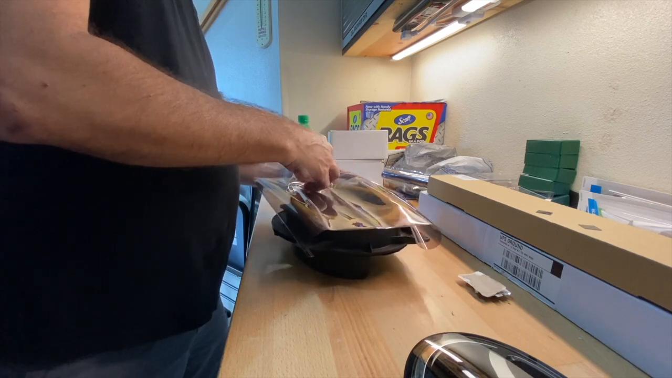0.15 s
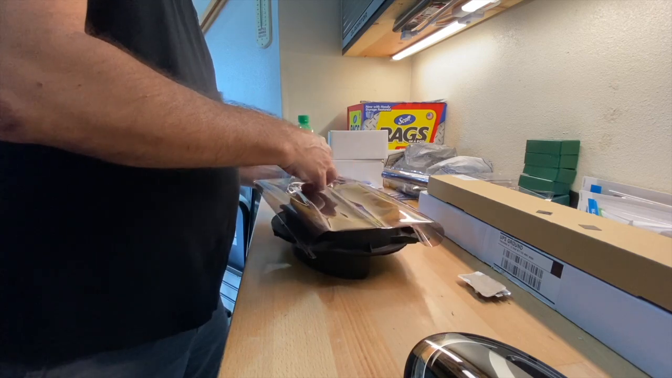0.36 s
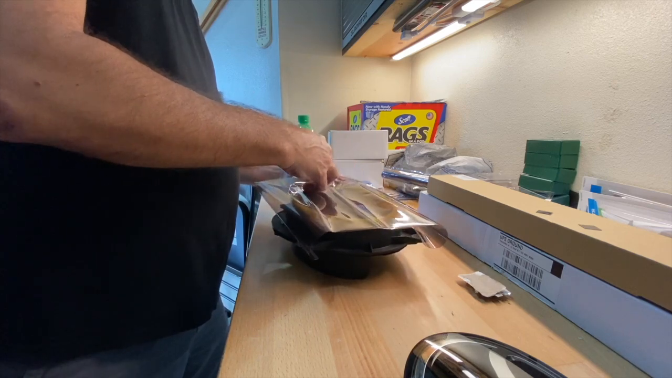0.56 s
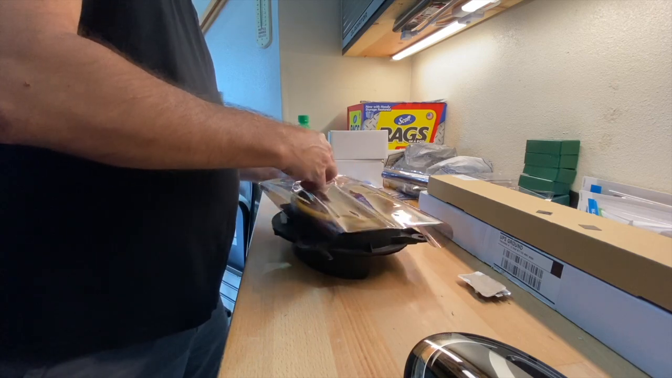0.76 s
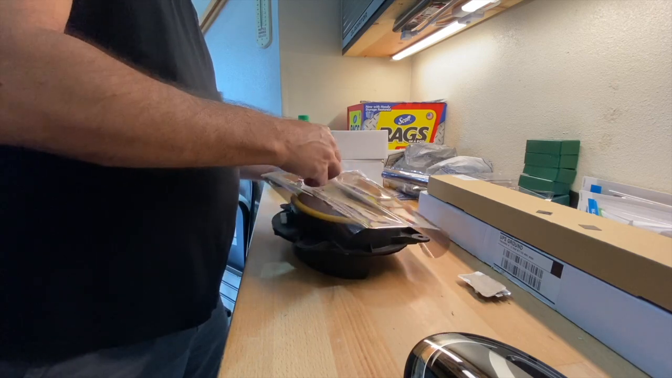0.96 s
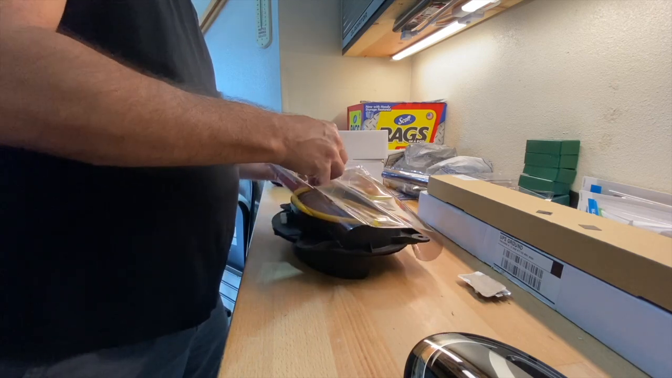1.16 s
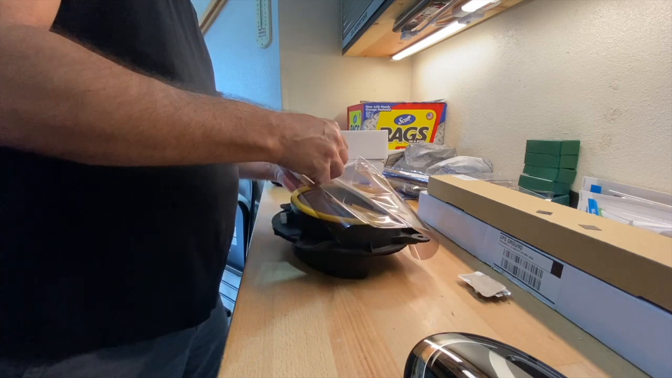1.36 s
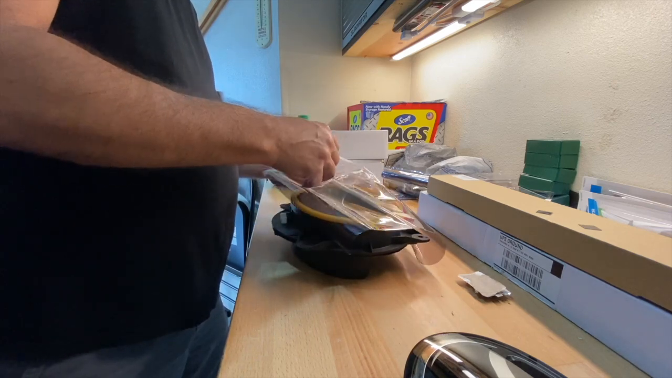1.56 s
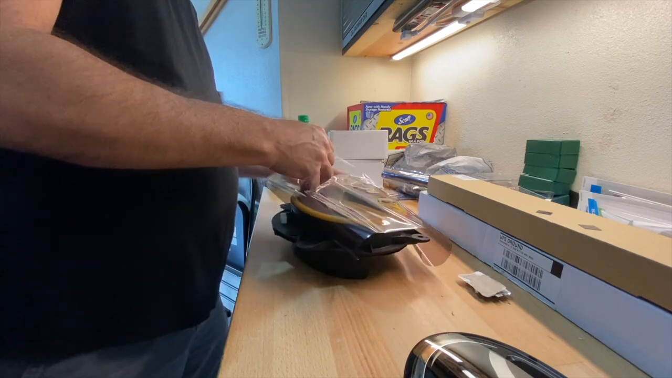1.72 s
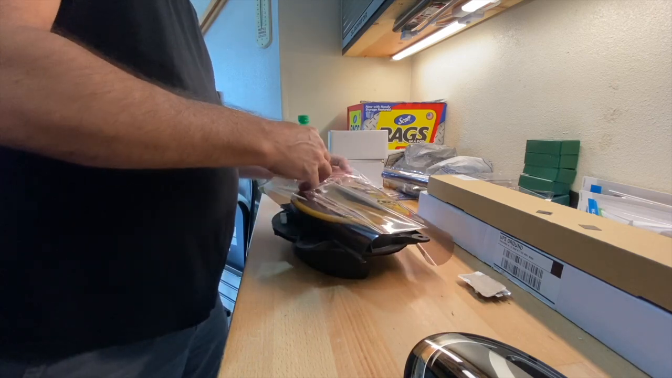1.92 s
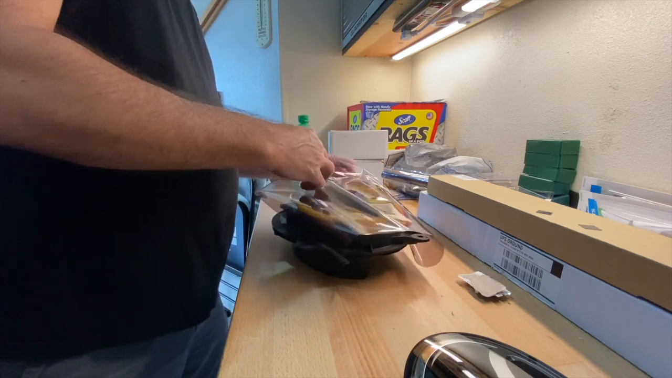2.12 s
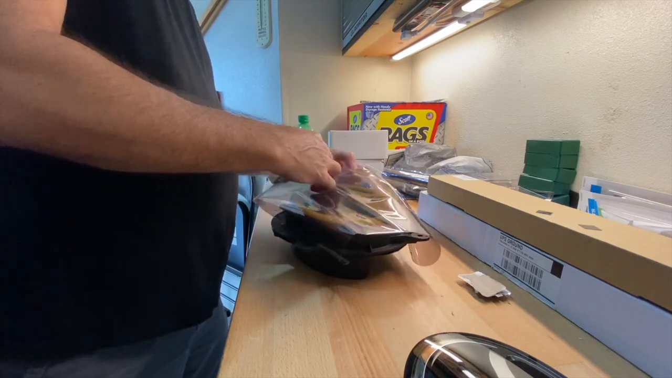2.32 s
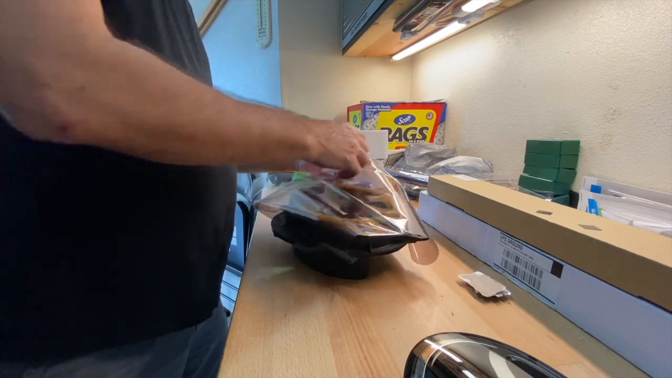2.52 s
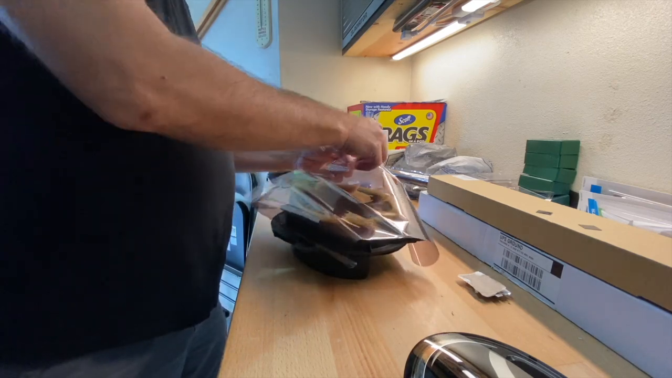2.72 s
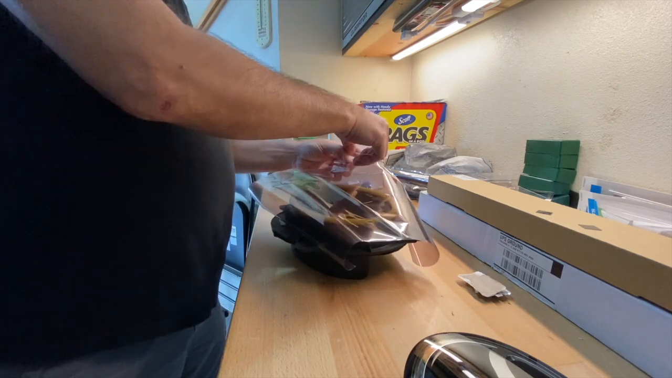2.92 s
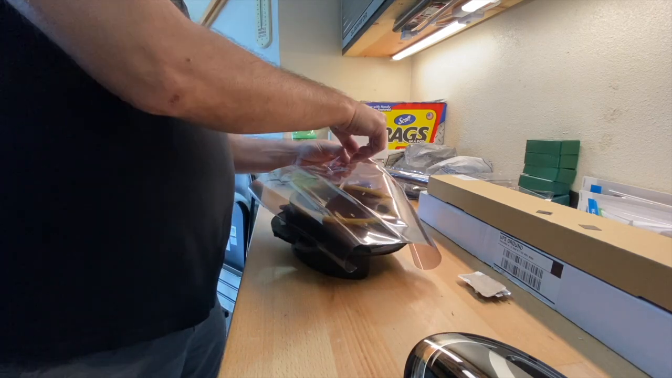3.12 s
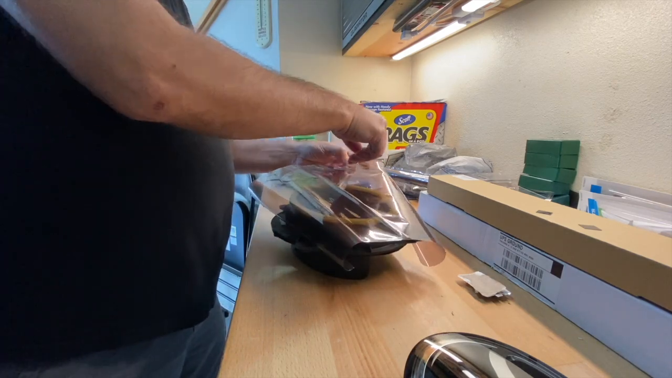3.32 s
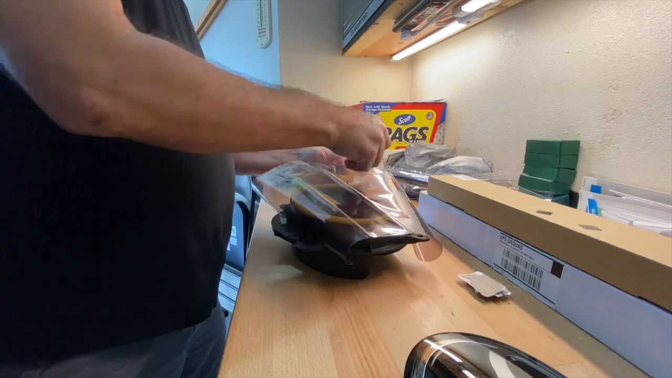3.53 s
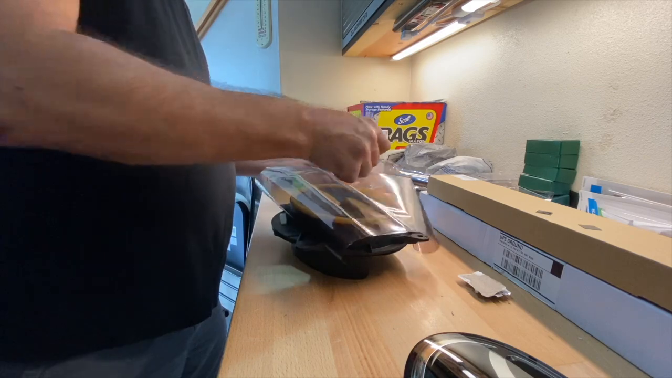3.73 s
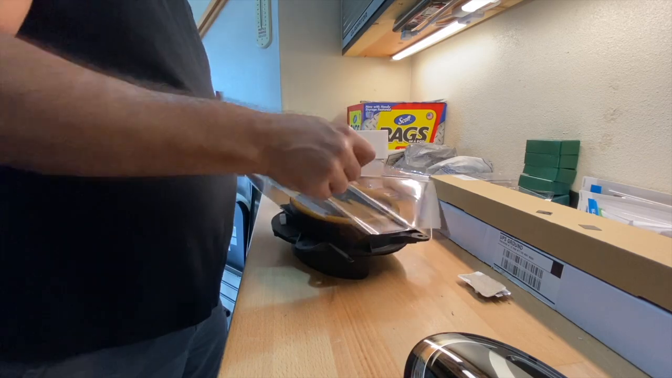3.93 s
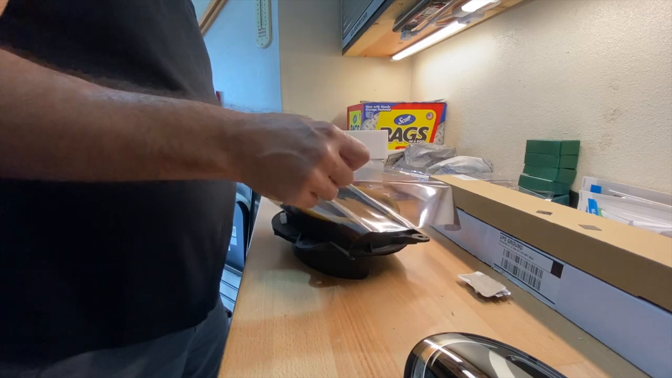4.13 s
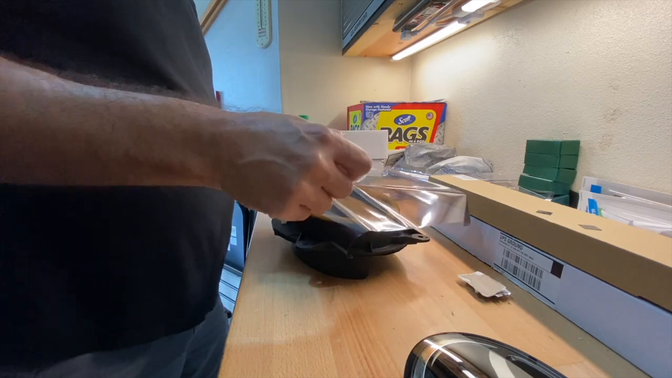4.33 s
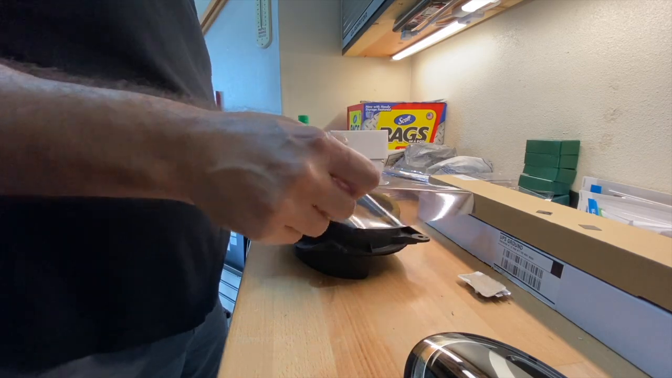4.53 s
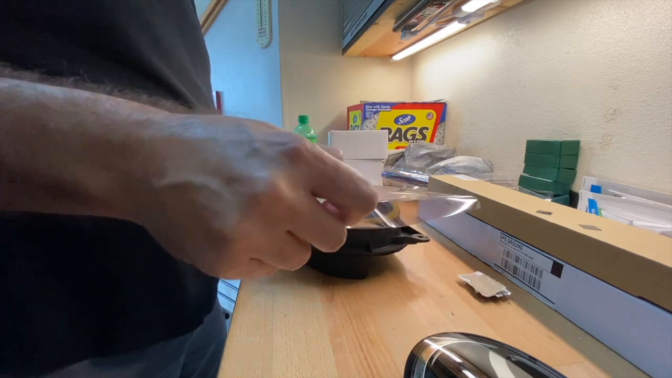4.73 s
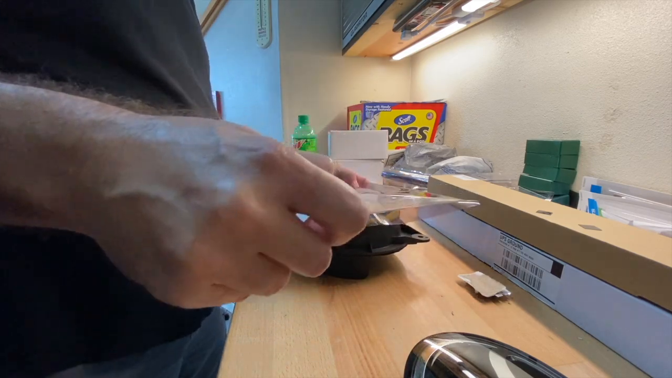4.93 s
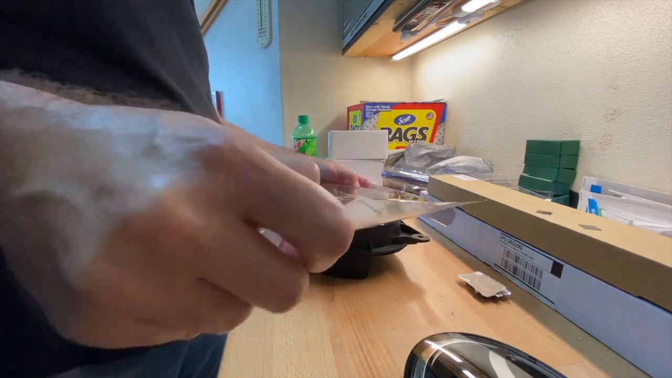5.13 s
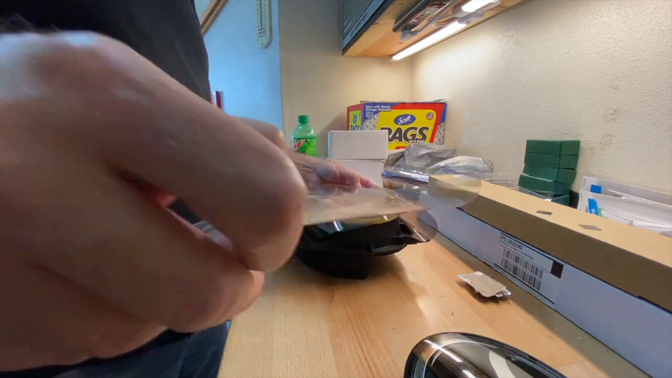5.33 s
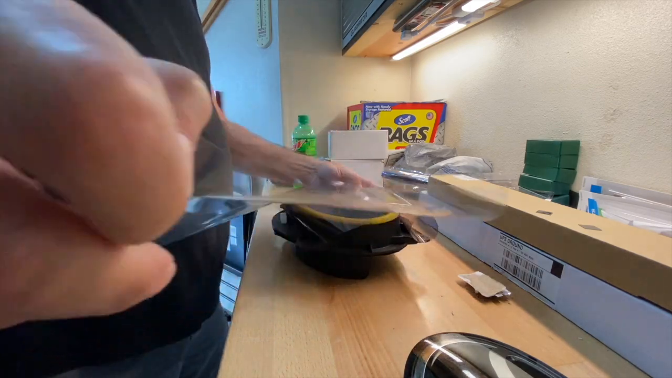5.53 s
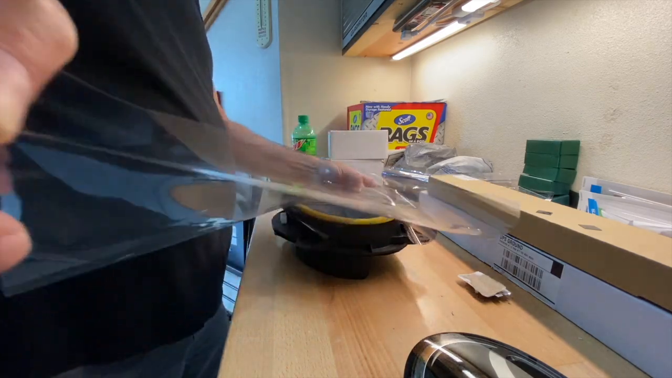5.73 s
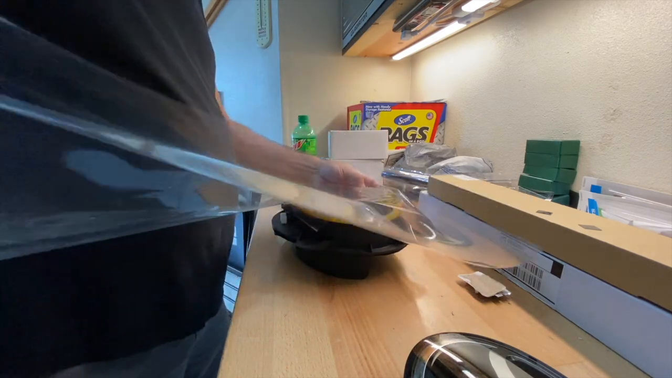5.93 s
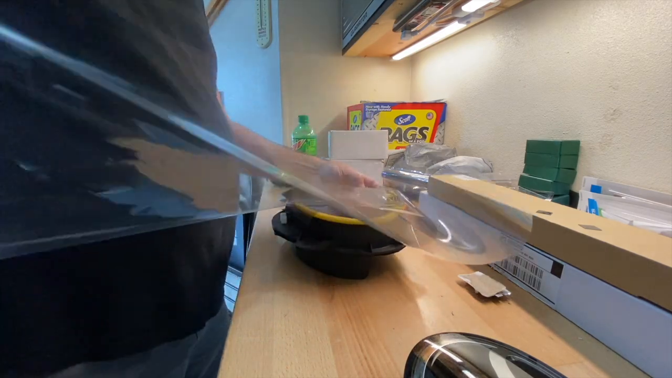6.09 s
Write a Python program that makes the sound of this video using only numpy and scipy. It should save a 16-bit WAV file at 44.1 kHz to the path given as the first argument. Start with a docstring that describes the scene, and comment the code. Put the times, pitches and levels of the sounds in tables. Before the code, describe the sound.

Close, crisp crinkling and sharp snapping of clear protective film being pulled loose in jerks, with dull plastic pops and a faint low room rumble.

```python
"""Faint ticks over a low room rumble grow into bright, crackling snaps: a protective film is peeled by hand
off a thin, stiff plastic sheet over a workbench in a small room. The glue lets go in jerks; each snap is a
shaped noise burst with a ring and scatter. Random tiny grains make the crinkling, and rarer dull pops with
a brief tone are the sheet buckling, mostly what makes its low thumps too. Hands rub the plastic in grains
of a lower colour; a close two-port microphone picks it all up."""
import sys
import numpy as np
from scipy import signal
from scipy.fft import rfft, irfft, next_fast_len
from scipy.io import wavfile
from scipy.ndimage import uniform_filter1d

SR = 44100
rng = np.random.default_rng(int(sys.argv[2]) if len(sys.argv) > 2 else 0)


def output_pcm(signal):
    """Save a mono or channel-first signal as 16-bit PCM at the path in sys.argv[1].

    Samples are clipped to [-1, 1] before scaling.
    """
    pcm = np.clip(np.atleast_2d(signal).T, -1, 1) * 32767
    wavfile.write(sys.argv[1], SR, np.round(pcm).astype(np.int16))


N = 271652
TIME = np.arange(N) / SR
BURST_TIME = np.arange(4096) / SR
# frequency grid with room for one second of filter tail
FFT_SIZE = next_fast_len(N + SR, real=True)
HZ = np.maximum(np.arange(FFT_SIZE // 2 + 1) * SR / FFT_SIZE, 1)


def from_db(db):
    """Decibels to gain."""
    return 10 ** (np.asarray(db) / 20)


def rms_one(x):
    """Scale to unit power."""
    return x / np.sqrt(np.mean(np.abs(x) ** 2) + 1e-20)


def at_hz(points):
    """Read a table at every frequency, joined on a log axis."""
    hz, value = np.transpose(points)
    return np.interp(np.log(HZ), np.log(hz), value)


def coloured(x, spectrum):
    """Causal (minimum-phase) filter with this spectrum's shape and unit power gain."""
    cepstrum = irfft(np.log(rms_one(from_db(at_hz(spectrum)))), FFT_SIZE)
    # folding the cepstrum onto positive time gives minimum phase
    cepstrum[1:FFT_SIZE // 2] *= 2
    cepstrum[FFT_SIZE // 2 + 1:] = 0
    response = np.exp(rfft(cepstrum))
    return irfft(rfft(x, FFT_SIZE) * response, FFT_SIZE)[:, :N]


def filtered(x, order, hz, kind="low"):
    """Butterworth filter."""
    return signal.sosfilt(signal.butter(order, hz, kind, fs=SR, output="sos"), x)


def add(out, start_s, sound):
    """Mix a short sound in at a time."""
    start = max(round(start_s * SR), 0)
    out[:, start:start + sound.shape[1]] += sound[:, :N - start]


def burst(rise_s, decay_s, lumpy_db):
    """Bending waves spread from a slip and come back unevenly from the creases; each port hears its own mix."""
    lumps = rms_one(uniform_filter1d(rng.standard_normal(len(BURST_TIME)), size=50))
    envelope = (1 - np.exp(-BURST_TIME / rise_s)) * np.exp(-BURST_TIME / decay_s)
    envelope = envelope * from_db(lumpy_db * lumps)
    return rms_one(envelope * rng.standard_normal((2, len(BURST_TIME))))


def grains(per_s, spread_db, decay_s):
    """Tiny slips at random, mostly weak and a few strong, each dying away exponentially; unit power."""
    sizes = from_db(spread_db * np.minimum(rng.exponential(1, N), 3.5))
    hits = rng.random(N) < per_s / SR
    decay_per_sample = np.exp(-2 / (decay_s * SR))
    power = signal.lfilter([1], [1, -decay_per_sample], hits * sizes ** 2 + 1e-18)
    return rms_one(np.sqrt(power) * rng.standard_normal((2, N)))


# Spectrum of the room's rumble: pitch_hz, relative density_db (per Hz)
RUMBLE_COLOUR = [(25, -15.5), (75, -2), (250, -18), (700, -23), (5000, -32.5), (14000, -55)]


def room_rumble(level_db):
    """The room's steady low rumble is shaped noise."""
    return from_db(level_db) * coloured(rng.standard_normal((2, N)), RUMBLE_COLOUR)


def room(x, tail_db, t60_s, wall_hz):
    """The tail of a small room is decaying noise, dulled by its walls."""
    t = np.arange(SR) / SR
    tail = rng.standard_normal((2, SR)) * (1 - np.exp(-t / .0042)) * from_db(-60 * t / t60_s)
    tail = filtered(rms_one(tail) / np.sqrt(SR), 2, min(wall_hz, SR * .45))
    return x + from_db(tail_db) * signal.fftconvolve(x, tail, axes=1)[:, :N]


# Pulls on the film: start_s, end_s, crinkling_db, rubbing_db (both at the start, before layer trims)
PULLS = [(0.103, 0.095, -89, -63), (0.684, 0.72, -63, -50), (0.885, 1.02, -30.5, -40),
         (1.184, 1.243, -31.5, -42.5), (1.542, 1.884, -41.5, -44), (2.16, 2.185, -43, -47.5),
         (2.315, 2.372, -36, -47.5), (2.44, 2.78, -51.5, -60.5), (3.494, 3.8, -37, -53),
         (3.688, 4.277, -32.5, -48), (4.314, 4.87, -34, -48.5), (4.774, 5.27, -42, -48.5),
         (5.416, 5.83, -38.5, -41), (5.635, 6.3, -58, -54.5)]


def pulling(levels_db, rise_db_per_s, fall_db_per_s, sag_db_per_s=2.5):
    """Level in dB through all pulls: each builds up, sags as the film gives way, and relaxes."""
    shapes = []
    for (start_s, end_s, *_), top_db in zip(PULLS, levels_db):
        early_s = np.maximum(start_s - TIME, 0)
        held_s = np.clip(TIME - start_s, 0, end_s - start_s)
        late_s = np.maximum(TIME - end_s, 0)
        shapes.append(top_db - rise_db_per_s * early_s - sag_db_per_s * held_s - fall_db_per_s * late_s)
    return np.max(shapes, axis=0)


# Low spectrum of the handled sheet: pitch_hz, relative density_db (per Hz)
HANDLING_COLOUR = [(50, -12.5), (110, -1.5), (260, -5), (450, 1.5), (650, -3.5), (930, 2.5), (3000, -11.5)]


def rubbing(hands_db):
    """Skin catches and slips on the plastic in soft, overlapping grains."""
    return from_db(hands_db + 3) * coloured(grains(per_s=110, spread_db=2.5, decay_s=.0098), HANDLING_COLOUR)


# Low thumps of the whole sheet, mostly as it buckles: start_s, level_db (before the colour and low-pass)
THUMPS = [(0.121, -42.5), (1.25, -39), (2.441, -40), (3.166, -43)]


def thumps(top_hz):
    """The whole sheet moves, mostly as it buckles, and thumps mainly in the bass."""
    out = np.zeros((2, N))
    for start_s, level_db in THUMPS:
        add(out, start_s, from_db(level_db) * burst(rise_s=.006, decay_s=.016, lumpy_db=1))
    return filtered(coloured(out, HANDLING_COLOUR), 2, top_hz)


def thuds(rows, gain_db, per_brightness_db):
    """Each snap also jolts the sheet in the hands; the large folds that snap dully jolt it most."""
    out = np.zeros((2, N))
    for start_s, level_db, brightness in rows:
        jolt_db = level_db + gain_db - per_brightness_db * brightness
        add(out, start_s, from_db(jolt_db) * burst(rise_s=.001, decay_s=.006, lumpy_db=3))
    return coloured(out, HANDLING_COLOUR)


# The whole sheet buckles: start_s, level_db (before the pop and tone gains), pitch_hz of the panel
BUCKLES = [(0.12, -49.5, 470), (0.522, -46.5, 440), (0.649, -31.5, 960), (0.801, -33.5, 970),
           (1.242, -30.5, 1044), (1.561, -32.5, 506), (1.66, -33.5, 784), (2.178, -38, 780),
           (2.441, -45.5, 327), (2.843, -40, 480), (3.167, -30, 954), (3.68, -33.5, 910), (5.527, -29, 870)]
# Spectrum of the pop: pitch_hz, relative density_db (per Hz)
BUCKLE_COLOUR = [(160, -6), (480, -2.5), (650, -3.5), (900, 3.5), (1400, -5.5), (2200, 0), (9000, -25)]


def buckles(gain_db, mode_db, mode_s):
    """A large area flips over: a dull pop, and the panel that flipped rings briefly."""
    pops, tones = np.zeros((2, 2, N))
    for start_s, level_db, pitch_hz in BUCKLES:
        add(pops, start_s, from_db(level_db + gain_db) * burst(rise_s=.002, decay_s=.006, lumpy_db=2))
        swing = np.sin(2 * np.pi * pitch_hz * BURST_TIME) * BURST_TIME * np.exp(-BURST_TIME / mode_s)
        add(tones, start_s, from_db(level_db + mode_db) * rms_one(swing[None]))
    return coloured(pops, BUCKLE_COLOUR) + tones


# Spectrum shared by crinkles, rasps and snaps: pitch_hz, relative density_db (per Hz)
SNAP_COLOUR = [(200, -26), (650, -23.5), (900, -11.5), (1350, -12), (1800, -3), (3900, -3.5), (5700, 1),
               (7700, -5), (10500, -4.5), (14500, -8.5), (16300, -40)]


def crinkles(peel_db, per_s, spread_db, decay_s, count=6):
    """Tiny slips of the film, each sounding in one of several pitch ranges, follow the pull."""
    edges_hz = np.geomspace(900, 16000, count + 1)
    slips = np.zeros((2, N))
    for band_hz in zip(edges_hz, edges_hz[1:]):
        slips += filtered(grains(per_s / count, spread_db, decay_s), 1, band_hz, "band")
    return from_db(peel_db - 4.5) * coloured(rms_one(slips), SNAP_COLOUR)


# A crease rolls along the film: start_s, level_db (before gain and colour), brightness_db_per_octave
RASPS = [(0.6514, -30.5, -4), (1.242, -19, 0), (1.4752, -26.5, -2.5), (1.558, -25, -1), (1.799, -26.5, 1),
         (2.041, -30.5, -3.5), (2.326, -26, 1), (2.335, -24.5, 0.5), (2.717, -35, -2), (3.159, -22, -0.5),
         (5.974, -19.5, -2.5)]


def rasps():
    """A rolling crease gives way slowly, in a drawn-out rasp with little ring."""
    return snaps(RASPS, gain_db=-10, rise_s=.012, decay_s=.006, ring_db=-12, bench_db=-8)


def stick_slip(peel_db, over_db, brightness, brightness_spread, spread_db=3, count=130):
    """Smaller snaps at loosely even times throughout, as loud as the pull is hard: rows like SNAPS."""
    jitter, size, colour = rng.standard_normal((count, 3)).T
    start_s = np.clip((np.arange(count) + .5 + .25 * jitter) / count, 0, 1) * TIME[-1]
    level_db = np.interp(start_s, TIME, peel_db) + over_db + spread_db * np.tanh(size)
    return np.transpose([start_s, level_db, brightness + brightness_spread * colour])


# Snaps that stand out from the crinkling, loud and faint:
# start_s, level_db (before gain and colour), brightness_db_per_octave
SNAPS = [(0.0123, -35.5, -5), (0.1045, -38, 4.5), (0.2377, -40.5, -7), (0.312, -49, 0.5),
         (0.3812, -37.5, -6), (0.637, -33.5, -4.5), (0.6877, -20, 7.5), (0.7789, -28.5, 5),
         (0.8065, -22.5, 1.5), (0.8608, -21.5, 2), (0.9155, -22.5, 5), (0.9408, -20, 4.5), (0.9478, -17, 5),
         (0.9727, -23, 1), (0.9962, -17, 3.5), (1.0132, -19, 6), (1.038, -24.5, 4), (1.0551, -10.5, 8),
         (1.0933, -25, 1.5), (1.1605, -17.5, 9), (1.1778, -22, 2), (1.1867, -23, 2.5),
         (1.2037, -25.5, -1.5), (1.2356, -29, 0.5), (1.2626, -21, -1), (1.283, -25.5, 2),
         (1.3125, -34, -0.5), (1.4276, -31.5, -2), (1.6613, -19.5, 5), (1.6915, -29, 2),
         (1.7617, -35.5, -1), (1.7876, -26.5, 4), (1.8987, -28, -1.5), (1.9635, -35, -4), (2.0866, -30, 5),
         (2.2637, -22.5, 4.5), (2.3609, -24, 3), (2.4058, -28.5, 4.5), (2.6499, -38, 0.5),
         (2.7088, -34.5, -3.5), (2.8437, -28, -3), (3.0131, -38.5, -3), (3.0523, -27, 2.5),
         (3.2986, -27, 4), (3.3141, -24, 0.5), (3.3515, -26.5, 2.5), (3.3714, -26, -1), (3.4424, -22, 1),
         (3.4811, -23.5, 2), (3.4937, -20.5, 4), (3.5177, -25, 1.5), (3.5289, -22.5, 3.5),
         (3.5422, -21.5, 3.5), (3.5551, -24, 4), (3.5693, -19, 3), (3.621, -28, 2), (3.682, -26, 6),
         (3.7088, -24.5, 5), (3.7226, -24.5, 3.5), (3.7325, -19.5, 3), (3.754, -17, 4), (3.7733, -23.5, 1),
         (3.821, -18.5, 2.5), (3.8491, -18, 4.5), (3.8854, -17, 8), (3.894, -18.5, 4.5), (3.9164, -20, 3.5),
         (3.9393, -20, 7.5), (3.9746, -20, 9), (3.9994, -22, 3), (4.033, -25, 1.5), (4.0517, -22, 5.5),
         (4.0646, -20, 3.5), (4.0768, -22, 3.5), (4.1335, -18.5, 1.5), (4.1456, -16.5, 3.5),
         (4.1663, -16.5, 6.5), (4.2179, -16, 8.5), (4.235, -24, 3.5), (4.304, -21.5, 4), (4.3221, -17.5, 7),
         (4.3584, -18.5, 6.5), (4.3885, -23, 1.5), (4.4333, -17.5, 8.5), (4.4559, -22, 2.5),
         (4.48, -27.5, 4), (4.5023, -21.5, 2.5), (4.5446, -24, 5.5), (4.5727, -22, 2.5), (4.6017, -20, 4),
         (4.6328, -23.5, 3), (4.6594, -20, 4), (4.7108, -23, 6), (4.7419, -22.5, 6), (4.7979, -21.5, 6.5),
         (4.8416, -26, 2), (4.8962, -27, 3.5), (4.9237, -23, 3.5), (4.9317, -22.5, 2.5),
         (4.9712, -21.5, 2.5), (5.0425, -26, 0.5), (5.077, -26.5, 0.5), (5.089, -21, 3.5),
         (5.1175, -21, 3.5), (5.1702, -19.5, 3.0), (5.2439, -14, 6), (5.2849, -22, 1.5), (5.3656, -29, -6),
         (5.4328, -20, 0.5), (5.461, -23, -2), (5.47, -22, 0.5), (5.4793, -20.5, -0.5),
         (5.5283, -21.5, 0.5), (5.5708, -19, 2), (5.6117, -17.5, 5.5), (5.637, -29, -4.5),
         (5.6631, -19.5, 3.5), (5.7639, -20.5, 2.5), (5.8329, -20.5, 2.5), (5.9009, -15.5, 5),
         (5.9725, -23.5, 3)]


def snaps(rows, gain_db, rise_s, decay_s, ring_db, bench_db):
    """A crack, the duller ring of the sheet, then scatter off bench and boxes; bright snaps ring least."""
    dull_hz, pivot_hz = 7800, 6500
    facet_db, facet_octaves = 5, .06
    out = np.zeros((2, N))
    hz = np.clip(np.fft.rfftfreq(len(BURST_TIME), 1 / SR), 600, None)
    fade = np.linspace(1, 0, len(BURST_TIME))
    for start_s, level_db, brightness in rows:
        # dull snaps come from larger folds, which give way more slowly
        slowness = from_db(-1.3 * brightness)
        crack = burst(rise_s=rise_s * slowness, decay_s=decay_s * slowness, lumpy_db=1)
        ring = from_db(ring_db - .35 * brightness) * burst(rise_s=.0015, decay_s=.0032, lumpy_db=3)
        scatter = from_db(bench_db) * burst(rise_s=.005, decay_s=.014, lumpy_db=2)
        spectrum = rfft(crack) + rfft(ring + scatter) / (1 + 1j * hz / dull_hz)
        # the creases around the slip bound small facets, which colour every snap differently
        facet_hz = np.exp(rng.uniform(np.log(1600), np.log(15000), (4, 1)))
        facets = facet_db / (1 + (np.log2(hz / facet_hz) / facet_octaves) ** 2)
        tilt_db = brightness * np.log2(hz / pivot_hz)
        snap = rms_one(irfft(spectrum * from_db(tilt_db + facets.max(axis=0))) * fade)
        # starting early makes room for the rise
        add(out, start_s - .0005 * slowness, from_db(level_db + gain_db) * snap)
    return coloured(out, SNAP_COLOUR)


def scene():
    """Snaps, rasps, buckles and crinkling in the room; rubbing hands, thumps, jolts and rumble below."""
    _, _, crinkle_db, rubbing_db = np.transpose(PULLS)
    peel_db = pulling(crinkle_db, rise_db_per_s=488, fall_db_per_s=164)
    hands_db = pulling(rubbing_db, rise_db_per_s=203, fall_db_per_s=57)
    # between pulls the hands only hold the sheet
    hands_db = np.maximum(hands_db, -74)
    rows = np.vstack([SNAPS, stick_slip(peel_db, over_db=4, brightness=2, brightness_spread=2)])

    below = room_rumble(level_db=-53.5) + rubbing(hands_db)
    below = below + thumps(top_hz=330) + thuds(rows, gain_db=-27, per_brightness_db=1.1)
    film = buckles(gain_db=-9.5, mode_db=-19, mode_s=.0025)
    film = film + crinkles(peel_db, per_s=500, spread_db=5.5, decay_s=.001)
    film = film + rasps()
    film = film + snaps(rows, gain_db=-10, rise_s=.002, decay_s=.0012, ring_db=2.5, bench_db=-5)
    return below + room(film, tail_db=-9.5, t60_s=.4, wall_hz=6500)


# Likeness of the two ports: pitch_hz, likeness (1 same, 0 unrelated, negative opposed)
LIKENESS = [(100, .85), (900, .5), (1400, -.3), (4000, -.1), (8000, .1), (9800, .98)]
# Balance of the two ports: pitch_hz, left_over_right_db
BALANCE = [(150, -5), (700, -1), (2200, 0), (4500, 5.5), (8000, -.5)]


def record(dry):
    """The ports largely agree in the bass and nearly match at the top, slightly late on the left; ends are cut."""
    ceiling, cutoff_hz = .9, 16300
    left, right = rfft(dry, FFT_SIZE)
    alike = np.clip(at_hz(LIKENESS), -1, 1)
    lag_s = np.where(HZ > 8000, .000206, 0)
    shared = alike * right * np.exp(-2j * np.pi * HZ * lag_s)
    left = shared + np.sqrt(1 - alike ** 2) * left
    lean = from_db(at_hz(BALANCE) / 2)
    both = irfft(np.array([left * lean, right / lean]), FFT_SIZE)[:, :N]
    both = filtered(both, 2, 45, "high")
    # the highest peaks are rounded off towards the ceiling
    both = both / (1 + (both / ceiling) ** 4) ** .25
    return signal.sosfilt(signal.ellip(10, .2, 80, cutoff_hz, fs=SR, output="sos"), both)


dry = scene()
out = record(dry)
output_pcm(out)
```